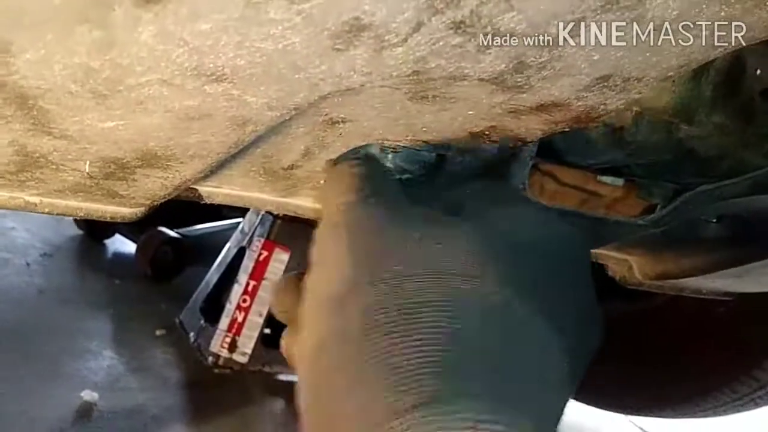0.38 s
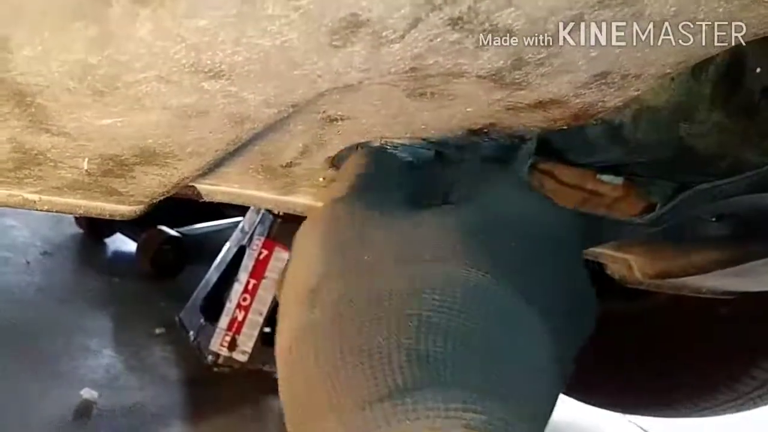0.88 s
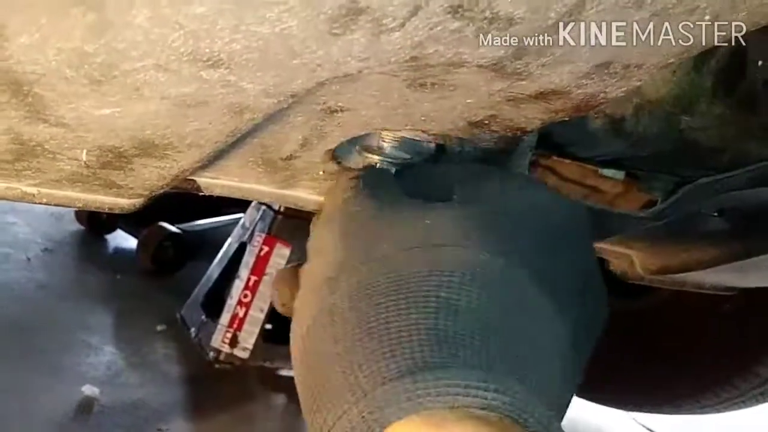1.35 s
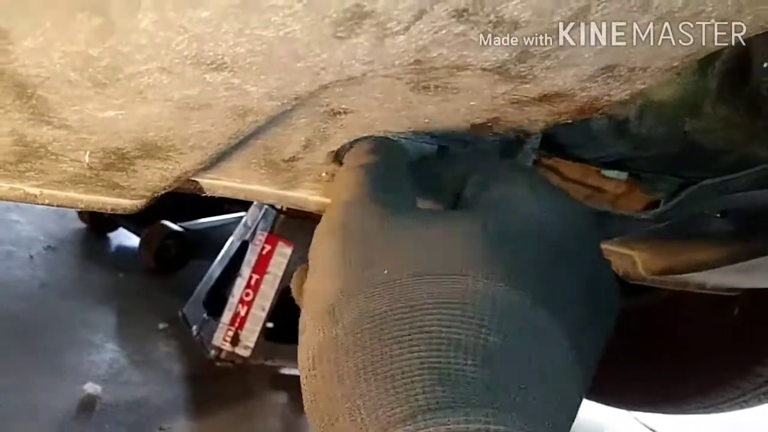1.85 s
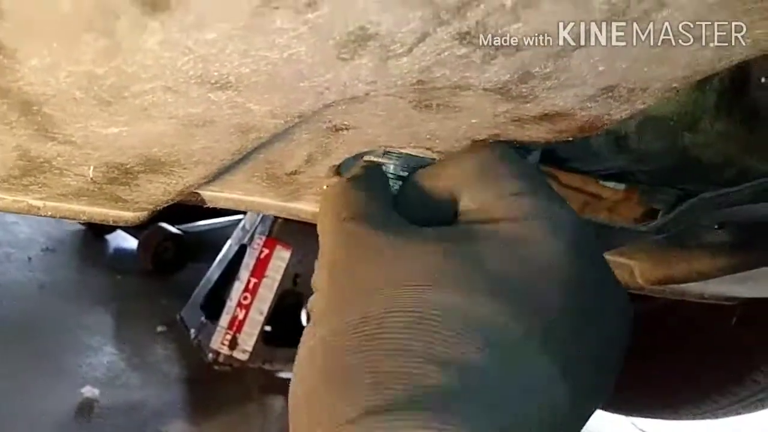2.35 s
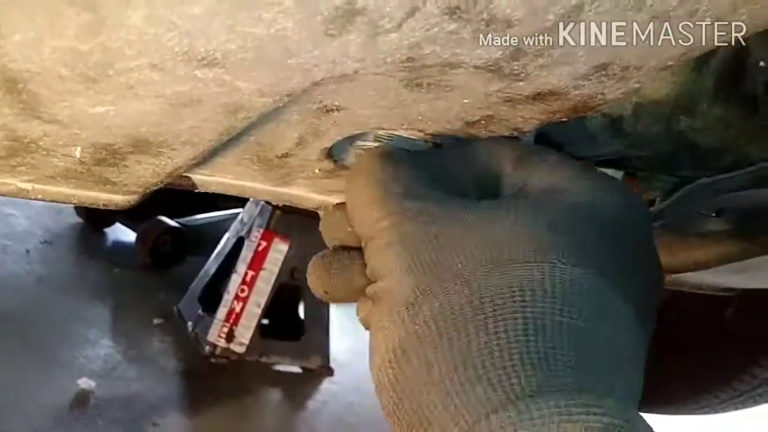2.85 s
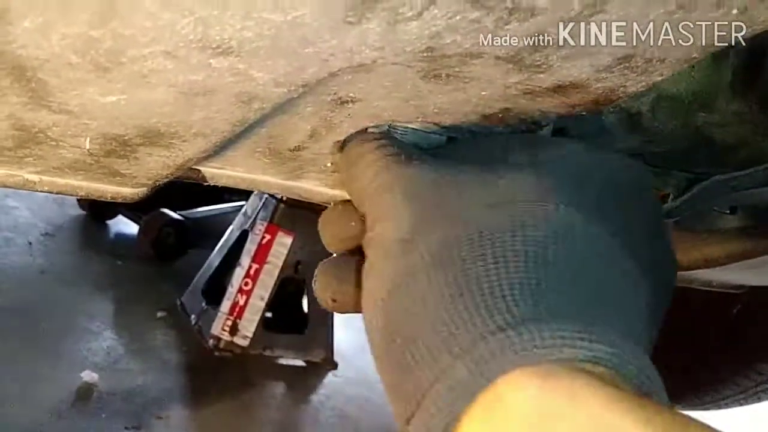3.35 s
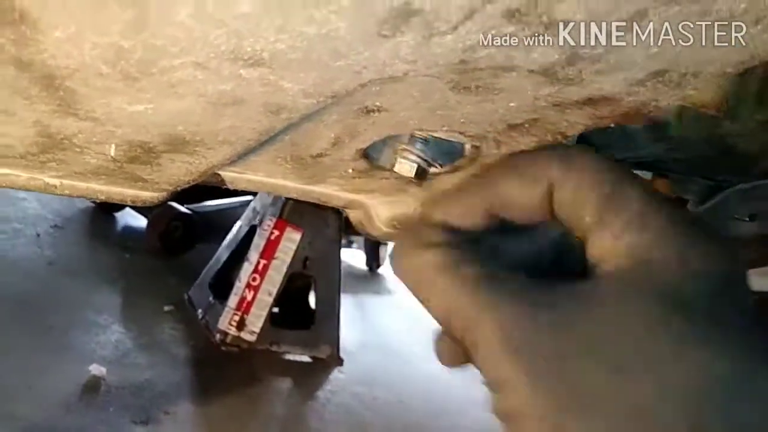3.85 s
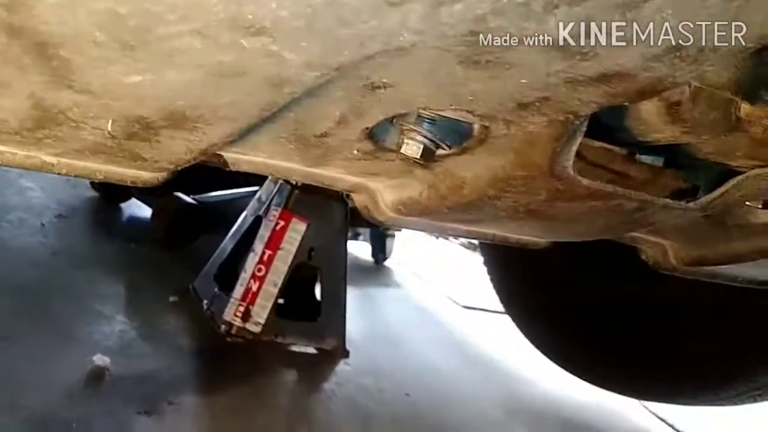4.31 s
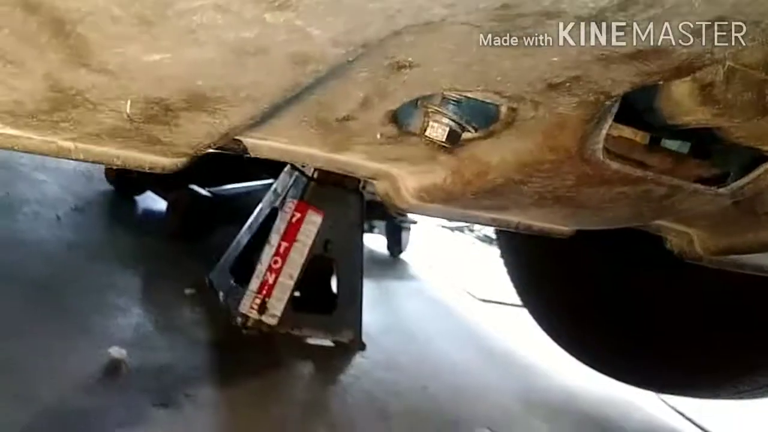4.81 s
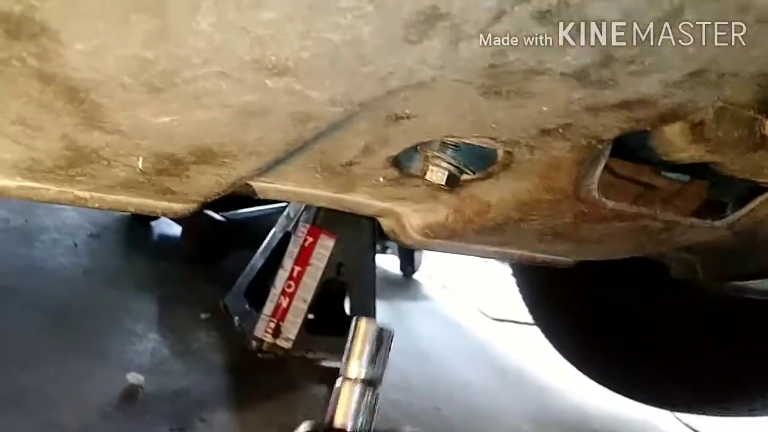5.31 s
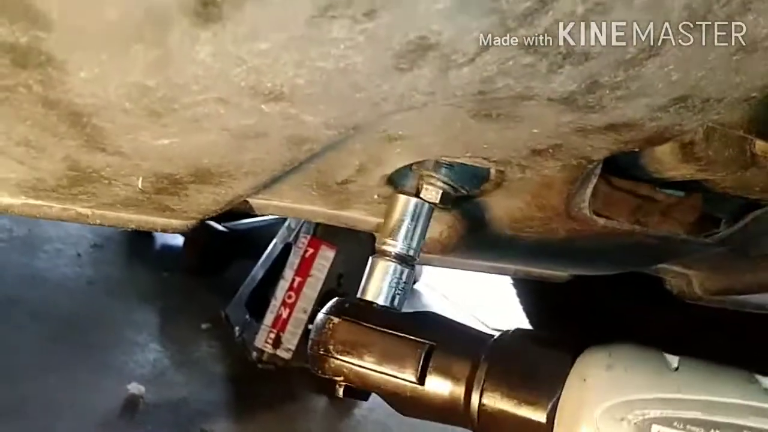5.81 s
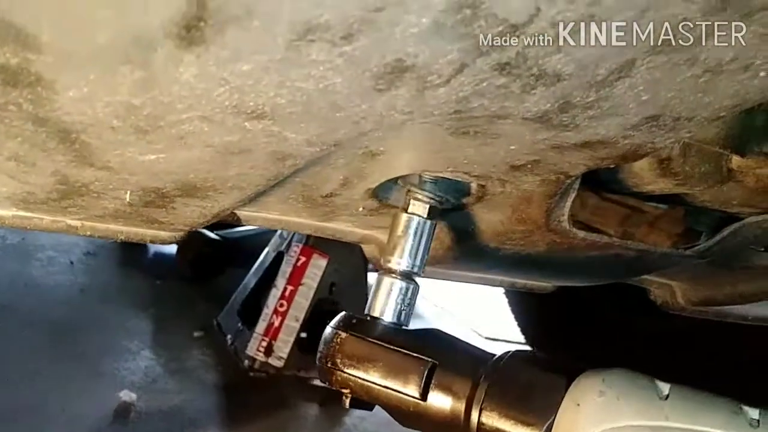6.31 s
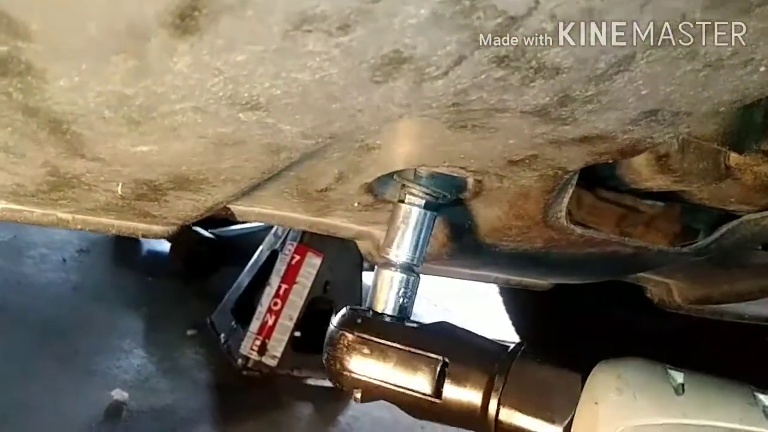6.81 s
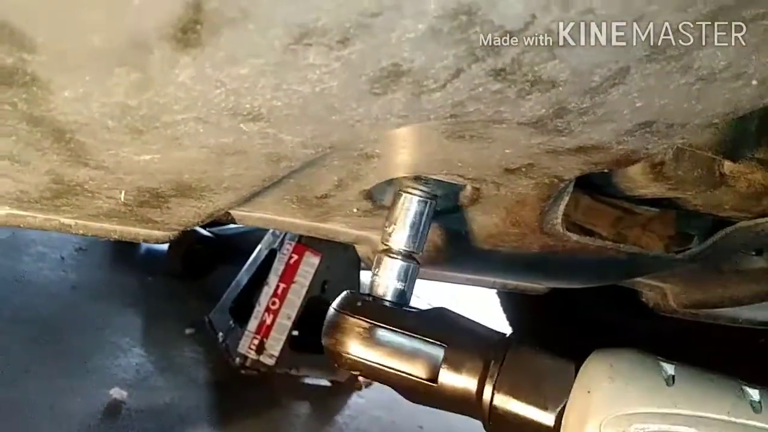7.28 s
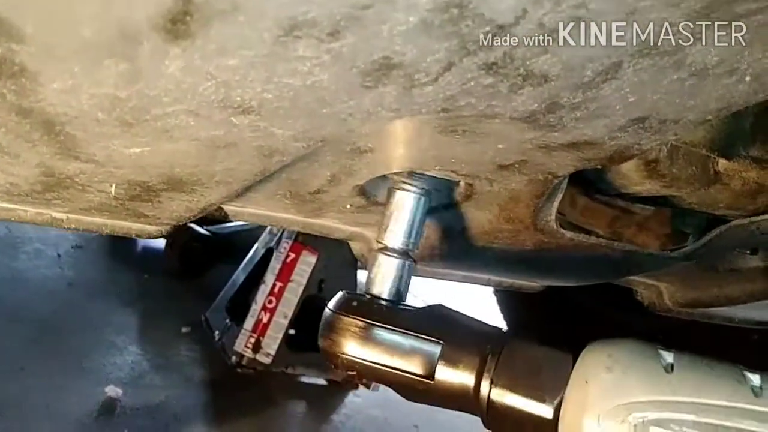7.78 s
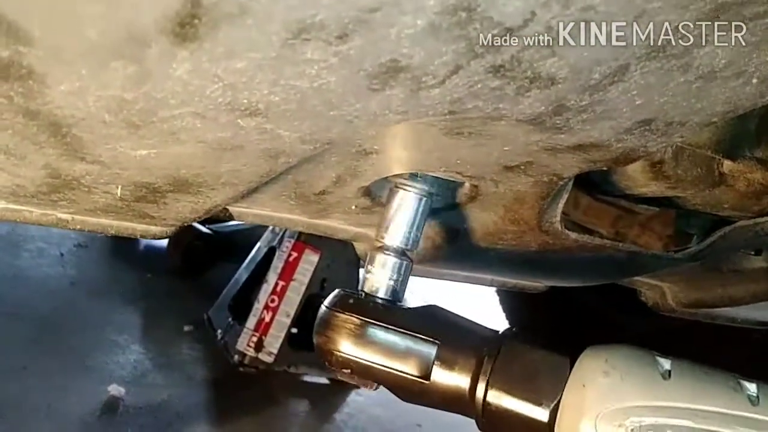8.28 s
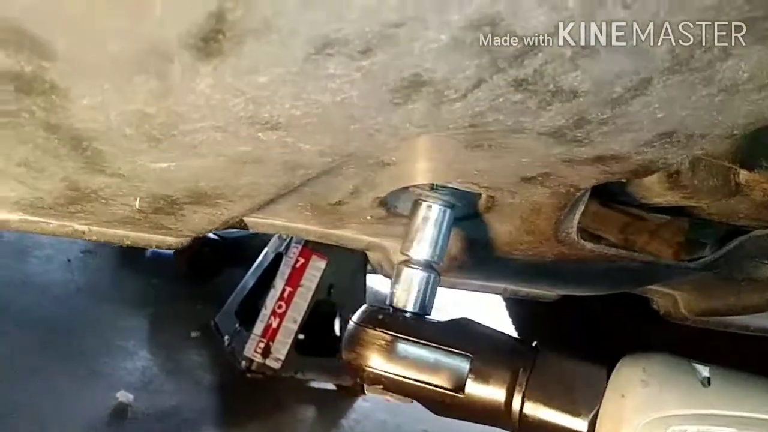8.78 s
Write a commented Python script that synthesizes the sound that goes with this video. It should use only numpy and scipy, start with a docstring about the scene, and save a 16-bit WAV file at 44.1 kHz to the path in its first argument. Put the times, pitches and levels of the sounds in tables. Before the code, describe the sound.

Close under a car in a hard-floored garage, a gloved hand works a bolt: light scuffs, gritty steel clinks and soft thuds on sheet metal. A sharp knock, then loose parts rattle quickly. After a near-silent pause a socket knocks onto the bolt several times, and a power ratchet spins up in a quick whine to a loud, steady, clicking rattle. Faint hum and low rumble lie beneath.

```python
"""Under a car in a garage a gloved hand scuffs and turns a bolt, parts and a steel socket clink, a power ratchet runs.
Scuffs are grains of friction, clinks gritty scrapes that ring steel, thuds soft pushes on the floor pan.
The ratchet whines up to sixty crank turns a second: yoke knocks swell its gear rattle, a pawl clicks, tones follow.
Mains hum, low rumble and faint hiss lie under it all; a limiter holds peaks near full scale."""
import sys
import numpy as np
from scipy import signal
from scipy.fft import rfft, irfft
from scipy.io import wavfile
from scipy.ndimage import uniform_filter1d, minimum_filter1d

SR = 44100
rng = np.random.default_rng(int(sys.argv[2]) if len(sys.argv) > 2 else 0)


def field_ratio(decibels):
    """Amplitude ratio for a level in dB (20 dB per decade); scalars and array-likes work."""
    return 10 ** (np.asarray(decibels, dtype=float) / 20)


def generate_wav(signal):
    """Clip the signal to [-1, 1] and save it as 16-bit WAV at the path in sys.argv[1]."""
    frames = np.transpose(np.atleast_2d(signal))
    scaled = np.clip(frames, -1, 1) * 32767
    pcm = np.round(scaled).astype(np.int16)
    wavfile.write(sys.argv[1], SR, pcm)


N = 403515
TIME_S = np.arange(N) / SR

# mains hum: (frequency [Hz], level [dB])
HUM_LINES = [(59.5, -73), (119, -64.5), (238, -61.5), (357, -75.5)]
# spectrum of rumble and hiss: (frequency [Hz], level [dB])
RUMBLE_SPECTRUM = [(60, -26), (130, 0.5), (250, -13), (330, -19), (450, -36), (4000, -40.5), (15000, -52.5)]
# echo decay between floor and floor pan: (frequency [Hz], T60 [s])
GARAGE_DECAY = [(300, 0.48), (800, 0.26), (5500, 0.22), (12000, .15)]
# hand on the floor pan: (time [s], peak [dB], pitch [Hz])
THUD_EVENTS = [(0.069, -31, 380), (0.289, -42.5, 501), (0.33, -36, 297), (1.129, -36, 347),
               (1.312, -33, 650), (1.399, -39, 945), (1.512, -42, 340), (1.778, -37.5, 910),
               (2.001, -34, 364), (2.35, -42.5, 475), (2.57, -31, 347), (2.809, -35.5, 354),
               (2.891, -39, 940), (2.943, -33.5, 820), (3.06, -35.5, 754), (3.262, -37.5, 755),
               (3.49, -39.5, 754), (3.538, -35.5, 463), (3.84, -29, 252), (3.923, -33.5, 480),
               (3.984, -35.5, 471), (7.059, -32, 366)]
# glove scuffs, loose-part rattles: (start [s], length [s], rms before the stroke's swell [dB], centre [Hz])
SCUFF_EVENTS = [(0, 0.018, -42.5, 2330), (0.023, 0.11, -53, 1860), (0.365, 0.15, -53, 2300),
                (0.473, 0.073, -55.5, 896), (0.81, 0.11, -47, 3440), (1.003, 0.14, -61, 660),
                (3.16, 0.055, -53.5, 1350), (3.485, 0.093, -59, 2924), (3.501, 0.048, -48, 553),
                (3.703, 0.039, -55, 2700), (4.343, 0.023, -50, 1680), (4.346, 0.023, -57, 4200),
                (4.393, 0.08, -68, 6800), (4.578, 0.21, -42.5, 2020), (6.4, 0.028, -44, 2600)]
# blows on bolt, socket, tool: (time [s], peak near 2.5 kHz [dB], drag [ms], low ring [dB], treble [dB])
CLINK_EVENTS = [(0.2945, -45.5, 5.7, -28, -46), (0.351, -34, 4.9, 2.5, -33), (0.5253, -41, 6.5, 5, -33),
                (0.599, -41, 4.4, -11, -66), (0.762, -35, 7.3, -13, -41), (0.802, -31, 3.2, -0.5, -26),
                (0.833, -35, 3.9, 5, -26), (0.975, -39.5, 3, -12, -29), (1.128, -44, 2.8, -25, -6),
                (1.189, -30, 3.6, -4, -25), (1.262, -29.5, 6.9, 0, -30.5), (1.3207, -31, 4.9, -7, -35),
                (1.405, -30, 1.95, 5, -36), (1.935, -21.5, 3.46, -4.5, -26), (2.044, -36, 2.2, -2, -24),
                (2.4352, -35.5, 6.4, -8, -15), (2.4612, -29, 4.4, 1.5, -21),
                (2.523, -23, 4.36, -3.5, -21.5), (2.6042, -36, 4.6, 3.5, -15), (2.888, -42, 2.5, 19, -18),
                (2.944, -43.5, 3.7, 10, -20), (3.754, -28, 6.7, -11, -15.5), (3.84, -9, 3.06, -9, -18),
                (4.275, -37.5, 0.57, -5, -94), (4.393, -29, 1.7, -1, -29.5), (4.4469, -35, 0.72, 2, -37),
                (4.4609, -25, 0.12, -1, -27), (4.481, -34, 0.46, 1, -22.5), (4.4895, -31, 0.28, 11, -13.5),
                (4.5724, -13.5, 0.4, -3, -30), (4.5981, -17.5, 0.29, 2, -8), (4.611, -22.5, 1.29, 5.5, 0),
                (4.643, -17.5, 1.22, -3, -27), (4.657, -25.5, 0.42, 14, -18), (4.685, -41, 1.3, -3, -2),
                (4.706, -21, 1.25, -0.5, -1), (4.745, -33.5, 1.02, 10.5, -27), (4.7752, -29, 0.57, 4, -32),
                (5.6758, -14, 3.25, -6, -21.5), (5.8413, -23.5, 2.72, 0, -18), (6.256, -28.5, 3.56, 1, -30),
                (6.4228, -13.5, 3.64, 0, -19.5), (6.574, -26.5, 2.7, 0.5, -25), (7.0847, -37, 2.8, 5, -27),
                (7.156, -14.5, 0.73, 7, 1)]
# centres of a blow's four levels: (frequency [Hz])
BLOW_BANDS_HZ = [1070, 2500, 4500, 8500]
# steel modes: (frequency [Hz], width [Hz], level under the hand [dB], level under the socket [dB])
STEEL_MODES = [(1070, 50, -1, 5), (1640, 90, -6, 0), (1950, 80, -4, -3), (2330, 100, 2, 2),
               (2860, 55, 3, -2), (3300, 55, 2, 2), (3820, 65, -4, -4), (4340, 90, -2, -12),
               (4720, 110, -8, -5), (15220, 50, 6, -8)]
# tone of the blows at the microphone: (frequency [Hz], gain [dB])
MIC_TONE = [(500, -9), (900, 2), (5000, 8.5), (6000, 0.5), (8500, 12.5), (11000, -6.5), (13500, -20),
            (15200, -5.5)]
# yoke knocks in a crank turn: (place [turns], level [dB])
YOKE_KNOCKS = [(.92, 2), (.08, 0), (.46, 2), (.56, -2)]
# pawl clicks in a crank turn: (place [turns], level [dB])
PAWL_CLICKS = [(.81, 27), (.39, 19)]
# colour of the gear rattle: (frequency [Hz], level [dB per Hz])
RATTLE_SPECTRUM = [(40, -38), (266, -19), (378, -17.5), (607, -5.5), (1050, -8.5), (1250, -7.5), (2920, 3),
                   (3750, -3.5), (4820, -2), (5700, -30), (7100, -11.5), (9210, -16.5), (12600, -47),
                   (15600, -42)]
# rings of the tool body: (frequency [Hz], width [Hz], level [dB])
TOOL_MODES = [(1040, 120, -10), (2010, 120, 0), (2880, 300, 4), (4190, 200, 4), (4840, 110, 6)]
# crank orders: (multiple of crank rate, level [dB])
CRANK_ORDERS = [(7, -40), (9, -38), (10, -36.5), (17, -36.5), (18, -39.5), (19, -37.5)]
# motor tone: (multiple of motor rate, level [dB])
MOTOR_ORDERS = [(0.99, -38)]

RUMBLE_DB = -58.5
SCUFF_GRAINS_PER_S, SCUFF_SPREAD_DB = 1300, 6
SCUFF_SPAN, SCUFF_SKIRT_DB = 1.42, -22  # band: centre / span to centre x span
SCUFF_RING_SHARE = .8
SQUEAK_SHARE, SQUEAK_SAG = .35, .06  # sag: part of its pitch lost along the stroke
LEAD_DRAGS, LEAD_DB = 2.5, -34  # slide before a strike: length in drag times, level
LOOSE_MS, LOOSE_RING_DB, HELD_RING_DB = 2, -13, -6.5  # shorter drags are loose parts: drier, less ring
SOCKET_FROM_S = 5  # the socket strikes after this
UPPER_DB, UPPER_SHARE = 2, 0.35  # upper ring follows the treble part of the way
CRANK_HZ, MOTOR_HZ, START_S, SPIN_UP_S = 59.89, 340.6, 7.14, .043
CRANK_AT_8S_TURNS = -.43
# once a socket turn the pawl catches late and bites harder
SOCKET_PERIOD_S, CATCH_AT_S, CATCH_DEPTH_TURNS, BITE_AT_S, BITE_DB = .37, 7.84, .04, 7.72, 3
RATTLE_DB, RATTLE_POWER, PAWL_DB, PAWL_POWER = -10.5, 0.66, -21.5, 0.3  # full-speed level, power of speed
WHINE_HZ, WHINE_FROM_S, WHINE_RISE_S = 1140, 7.125, .065
WHINE_DB, WHINE_IN_S, WHINE_END_S, WHINE_OUT_S = -31, 0.028, 7.28, 0.011
WHINE_RING_DB = 7  # boost as it crosses the lowest tool ring
WHINE_ROUGH_DB, WHINE_JITTER = 5, .02


def evened(x):
    """Scales to rms 1."""
    return x / np.sqrt(np.mean(x ** 2) + 1e-20)


def read(points, hz):
    """Interpolates a curve on a log-frequency axis."""
    f, value = np.transpose(points)
    return np.interp(np.log(hz + 1), np.log(f + 1), value)


def add(mix, start_s, sound):
    """Mixes a sound in at a time."""
    part = mix[round(start_s * SR):][:len(sound)]
    part += sound[:len(part)]


def colour(x, points):
    """Filters by a spectrum in dB."""
    gain = field_ratio(read(points, np.fft.rfftfreq(len(x), 1 / SR)))
    return irfft(rfft(x) * gain, len(x))


def resonate(x, hz, width_hz):
    """One damped mode, gain 1 at its peak."""
    r = np.exp(-np.pi * width_hz / SR)
    return 2 * signal.lfilter([1 - r], [1, -r * np.exp(2j * np.pi * hz / SR)], x).real


def garage(x, wet_db):
    """Direct sound plus dense echoes between concrete floor and floor pan, decaying per frequency."""
    echoes = rng.choice([-1., 1.], SR // 2) * (rng.random(SR // 2) < .1)
    hz, t, z = signal.stft(echoes, SR, nperseg=128)
    decay = field_ratio(-60 * t / read(GARAGE_DECAY, hz)[:, None])
    tail = signal.istft(z * decay, SR, nperseg=128)[1]
    tail *= np.clip(np.arange(len(tail)) / (0.00073 * SR), 0, 1)  # echoes build up
    return x + field_ratio(wet_db) * signal.oaconvolve(x, tail / np.linalg.norm(tail))[:N]


def hum():
    """Mains hum lines waver in level and phase over low rumble and faint hiss."""
    waver = uniform_filter1d(rng.standard_normal((2, len(HUM_LINES), N)), 3000, axis=2) * np.sqrt(3000)
    lines = np.zeros(N)
    for (hz, db), level_waver, phase_waver in zip(HUM_LINES, *waver):
        phase = hz * TIME_S + 0.12 * hz / 240 * phase_waver
        lines += field_ratio(db + 2.0 * level_waver) * np.sin(2 * np.pi * phase)
    rumble = evened(colour(rng.standard_normal(N), RUMBLE_SPECTRUM))
    return np.sqrt(2) * lines + field_ratio(RUMBLE_DB) * rumble


def thud(peak_db, hz):
    """A soft push rings a damped patch of sheet metal."""
    t = np.arange(4096) / SR
    push = rng.standard_normal(len(t)) * np.exp(-t / .008) * np.clip(t / .005, 0, 1) ** 2
    sound = resonate(resonate(push, hz, 50 + 0.42 * hz), hz, 540)
    sound += 0.26 * resonate(resonate(push, 0.54 * hz, 400), 0.54 * hz, 400)
    sound = resonate(sound, hz, 3 * hz)  # the glove dulls the top
    return field_ratio(peak_db) * sound / abs(sound).max()


def scuff(length_s, db, hz):
    """Uneven friction grains ring the steel and squeak, swelling and dying under one stroke."""
    t = np.arange(0, length_s, 1 / SR)
    spread = field_ratio(SCUFF_SPREAD_DB * np.minimum(rng.exponential(1, len(t)), 3))
    size = spread * rng.standard_normal(len(t))
    grains = size * (rng.random(len(t)) < SCUFF_GRAINS_PER_S / SR) + 0.046 * rng.standard_normal(len(t))
    ring = sum(field_ratio(db_hand) * evened(resonate(grains, f, width))
               for f, width, db_hand, _ in STEEL_MODES[:-1])
    sound = evened(grains) + SCUFF_RING_SHARE * evened(ring)
    squeak_hz = hz * (1 - SQUEAK_SAG * (t / length_s - .5))
    carrier = np.exp(2j * np.pi * np.cumsum(squeak_hz) / SR)
    fuzz = uniform_filter1d(rng.standard_normal(len(t)), size=400)
    sound += SQUEAK_SHARE * evened((carrier * fuzz).real)
    band = [(hz / SCUFF_SPAN ** 3, SCUFF_SKIRT_DB), (hz / SCUFF_SPAN, 0), (hz * SCUFF_SPAN, 0),
            (hz * SCUFF_SPAN ** 3, SCUFF_SKIRT_DB), (hz * SCUFF_SPAN ** 6, 2 * SCUFF_SKIRT_DB)]
    stroke = np.sin(np.pi * (t / length_s) ** .6)
    return field_ratio(db) * evened(colour(sound, band)) * stroke


def clink(strike_s, peak_db, drag_ms, low_db, treble_db):
    """A part slides in, a gritty scrape rings the steel; faint uneven rubbing trails off."""
    t = np.arange(8192) / SR
    drags = t * 1000 / drag_ms
    u = np.maximum(drags - LEAD_DRAGS, 0)  # drag times since the strike
    grit, chance = rng.standard_normal((3, len(u))), rng.standard_normal((len(STEEL_MODES), 2))
    rubbing = field_ratio(-24 + 65 * uniform_filter1d(grit[2], size=150)) * np.exp(-t / .04) * np.clip(u, 0, 1)
    soft = np.interp(peak_db, [-26, -12], [2, .8])  # hard blows start abruptly, light ones swell in
    scrape = u ** soft * np.exp(-(.3 + 0.55 * soft) * u)
    slide = (strike_s < SOCKET_FROM_S) * field_ratio(LEAD_DB) * drags / LEAD_DRAGS * np.exp(-u)
    burst = grit[0] * field_ratio(1.4 * abs(grit[1])) * (scrape + rubbing + slide)
    ring = np.zeros(len(t))
    for (hz, width, *mode_db), (level, detune) in zip(STEEL_MODES, chance):
        mode = evened(resonate(burst, hz * (1 + detune / 130), width))
        ring += field_ratio(mode_db[strike_s > SOCKET_FROM_S] + 3 * level) * mode
    ring_db = LOOSE_RING_DB if drag_ms < LOOSE_MS else HELD_RING_DB
    sound = evened(burst) + field_ratio(ring_db) * evened(ring)
    band_db = [low_db, 0, UPPER_DB + UPPER_SHARE * treble_db, treble_db]
    levels = [(600, low_db + 2.5), (1500, low_db / 2)] + list(zip(BLOW_BANDS_HZ, band_db))
    sound = colour(colour(sound, sorted(levels)), MIC_TONE)
    sound *= np.cos(np.pi / 2 * t / t[-1])  # fades out to nothing
    return field_ratio(peak_db) * sound / abs(resonate(sound, BLOW_BANDS_HZ[1], 1200)).max()


def whine():
    """Gears whine upward as the motor gathers speed, rough in level and pitch, then fade."""
    t = np.arange(START_S, START_S + .3, 1 / SR)
    hz = WHINE_HZ * (1 - np.exp((WHINE_FROM_S - t) / WHINE_RISE_S))
    pitch, rough = evened(uniform_filter1d(rng.standard_normal((2, len(t))), size=400, axis=1))
    hz = hz * (1 + WHINE_JITTER * pitch)
    ring_hz, width_hz, _ = TOOL_MODES[0]
    ring_boost_db = WHINE_RING_DB / (1 + (2 * (hz - ring_hz) / width_hz) ** 2)
    db = WHINE_DB + WHINE_ROUGH_DB * rough + ring_boost_db
    fade_in = np.clip((t - START_S) / WHINE_IN_S, 0, 1) ** 2
    fade_out = np.exp(np.minimum(WHINE_END_S - t, 0) / WHINE_OUT_S)
    return np.sqrt(2) * field_ratio(db) * fade_in * fade_out * np.sin(2 * np.pi * np.cumsum(hz) / SR)


def blows(turns, pattern, jitter_turns, spread_db):
    """One impulse per pattern place in every turn, uneven in time and level."""
    whole, out = np.arange(np.ceil(turns[0]), turns[-1])[:, None], np.zeros(len(turns))
    place, db = np.transpose(pattern)
    late, louder = rng.standard_normal((2, len(whole), len(place)))
    at = np.searchsorted(turns, whole + place + jitter_turns * late).clip(0, len(turns) - 1)
    np.add.at(out, at, field_ratio(db + spread_db * louder))
    return out


def gear_rattle(turns, fade):
    """Gritty noise swells at each yoke knock and rings the tool body."""
    knocks = blows(turns, YOKE_KNOCKS, 0.026, spread_db=2.5)
    swell = 0.45 + evened(np.convolve(knocks, fade)[:len(turns)])
    grit = rng.standard_normal(len(turns)) * field_ratio(2.35 * rng.exponential(1, len(turns)))
    rattle = evened(grit * swell)
    rings = sum(field_ratio(db) * evened(resonate(rattle, hz, width)) for hz, width, db in TOOL_MODES)
    return evened(evened(colour(rattle, RATTLE_SPECTRUM)) + 0.45 * evened(rings))


def pawl(t, turns, fade):
    """Two bright clicks a crank turn: noise bursts through treble resonances."""
    catch = turns - CATCH_DEPTH_TURNS * np.cos(2 * np.pi * (t - CATCH_AT_S) / SOCKET_PERIOD_S)
    clicks = blows(catch, PAWL_CLICKS, .02, spread_db=2)
    clicks = np.convolve(clicks, fade * (1 - fade ** 3))[:len(t)] * rng.standard_normal(len(t))
    clicks *= field_ratio(BITE_DB * np.cos(2 * np.pi * (t - BITE_AT_S) / SOCKET_PERIOD_S))
    ringing = resonate(clicks, 8830, 620) + resonate(clicks, 9400, 690)
    return evened(resonate(ringing, 8730, 2250))


def drive_tones(turns):
    """Wavering crank orders and a steady motor tone, all locked to the crank."""
    waver = uniform_filter1d(rng.standard_normal((len(CRANK_ORDERS), len(turns))), 5000, axis=1)
    waver *= np.sqrt(5000)
    tones = np.zeros(len(turns))
    for (order, db), w in zip(CRANK_ORDERS, waver):
        tones += field_ratio(db + 2.8 * w) * np.sin(2 * np.pi * (order * turns + 0.15 * w + rng.random()))
    for order, db in MOTOR_ORDERS:
        tones += field_ratio(db) * np.sin(2 * np.pi * order * MOTOR_HZ / CRANK_HZ * turns)
    return np.sqrt(2) * tones


def ratchet():
    """The crank spins up exponentially and drives gear rattle, pawl and tones."""
    t = TIME_S[TIME_S >= START_S]
    lag = np.exp((START_S - t) / SPIN_UP_S)
    speed = 1 - lag
    turns = CRANK_HZ * (t - 8 + SPIN_UP_S * lag) + CRANK_AT_8S_TURNS
    fade = np.exp(-np.arange(600) / SR / 0.0043)
    impacts = field_ratio(RATTLE_DB) * speed ** RATTLE_POWER * gear_rattle(turns, fade)
    impacts += field_ratio(PAWL_DB) * speed ** PAWL_POWER * pawl(t, turns, fade)
    out = np.zeros(N)
    add(out, START_S, impacts)
    out = garage(out, wet_db=-16)
    add(out, START_S, drive_tones(turns) * np.clip((t - START_S) / 0.24, 0, 1))
    return out


def scene():
    """Hum, handling noises and ratchet, with echoes set per group."""
    steel, loose, pan = np.zeros((3, N))
    for time_s, *row in THUD_EVENTS:
        add(pan, time_s, thud(*row))
    for start_s, *row in SCUFF_EVENTS:
        add(steel, start_s, scuff(*row))
    for strike_s, *row in CLINK_EVENTS:
        drag_ms = row[1]
        part = loose if drag_ms < LOOSE_MS else steel
        add(part, strike_s - LEAD_DRAGS * drag_ms / 1000, clink(strike_s, *row))
    add(pan, START_S, whine())
    handling = garage(steel, wet_db=-2.5) + garage(loose, wet_db=-9) + garage(pan, wet_db=-5)
    return (hum() + handling + ratchet())[None]


def suppressed(x, gate_db, depth_db):
    """Noise suppressor: above the bass, bands near a gate that is lower in the treble are turned down."""
    hz, t, z = signal.stft(x, SR, nperseg=512, noverlap=384)
    power = uniform_filter1d(uniform_filter1d(abs(z) ** 2, size=5, axis=0), size=5, axis=1)
    gate = field_ratio(2 * gate_db) / (1 + (hz[:, None] / 2500) ** 2)
    keep = np.maximum(1 - gate / (power + 1e-20), field_ratio(-depth_db))
    keep[hz < 450] = 1
    return signal.istft(z * keep, SR, nperseg=512, noverlap=384)[1][:N]


def limiter_gain(x):
    """Quick look-ahead gain that holds peaks near full scale."""
    room_left = np.minimum(1, .99 / (abs(x) + 1e-9))
    return uniform_filter1d(minimum_filter1d(room_left, size=61), size=41)


def band_limit(x):
    """A steep low-pass at the top of the band."""
    return signal.sosfilt(signal.butter(12, 15710, fs=SR, output="sos"), x)


def record(dry):
    """The microphone drops deep bass and top; a suppressor cuts faint sound; a limiter holds peaks."""
    heard = colour(dry[0], [(25, -30), (55, 0), (15400, 0), (15600, -50)])
    held = suppressed(heard, gate_db=-99.0, depth_db=12.0) * limiter_gain(heard)
    return band_limit(held[None])


dry = scene()
out = record(dry)
generate_wav(out)
```